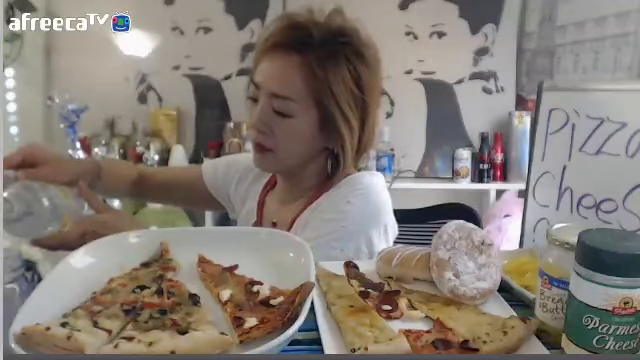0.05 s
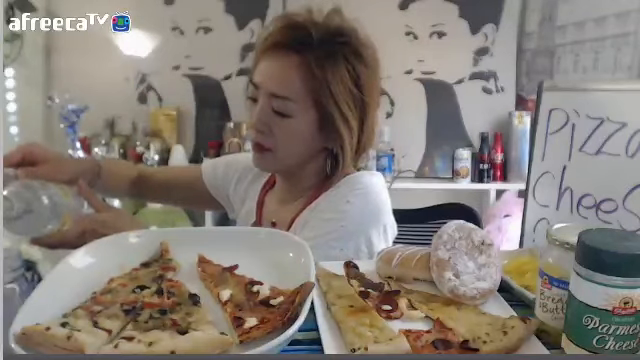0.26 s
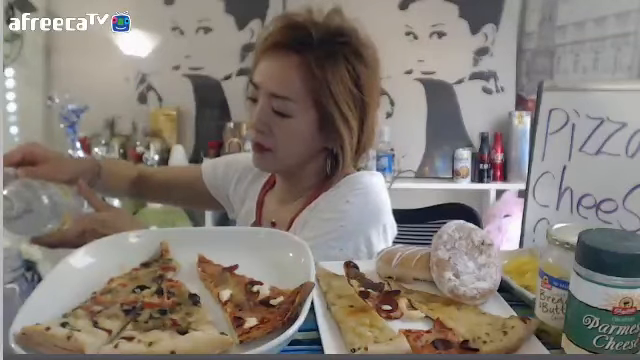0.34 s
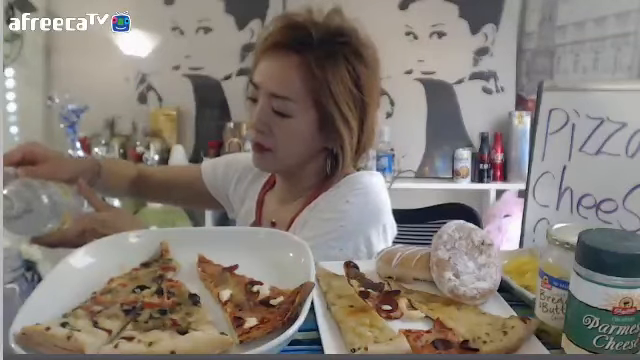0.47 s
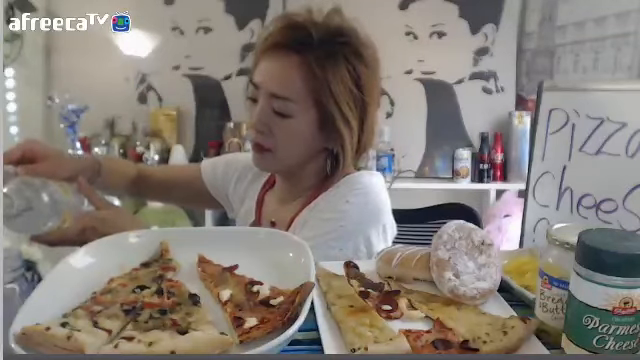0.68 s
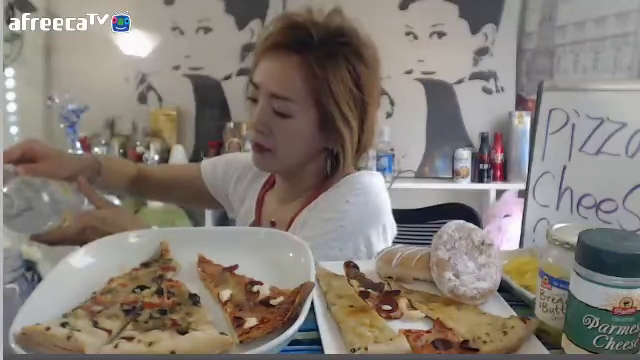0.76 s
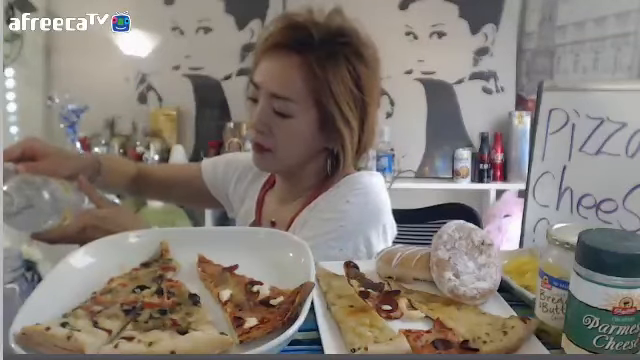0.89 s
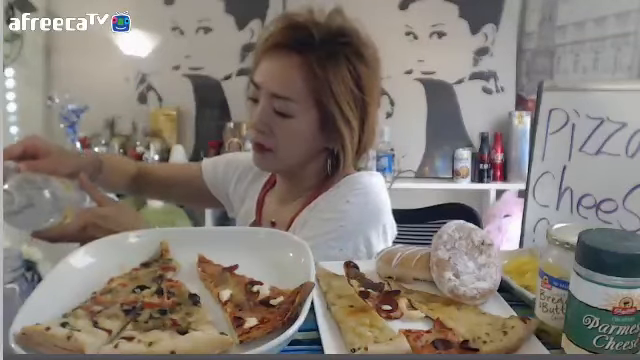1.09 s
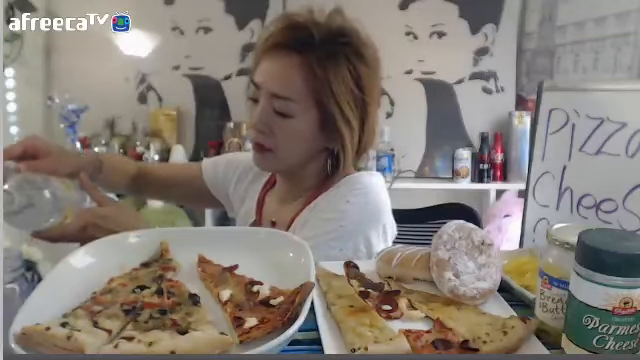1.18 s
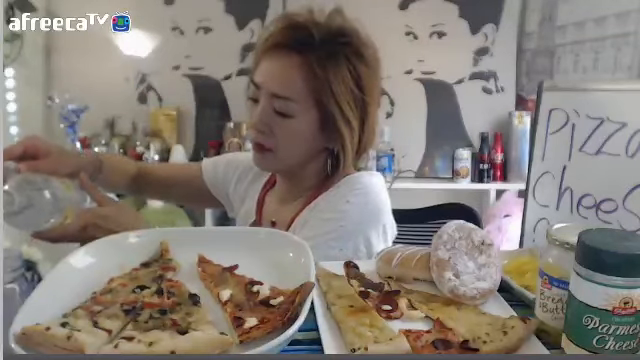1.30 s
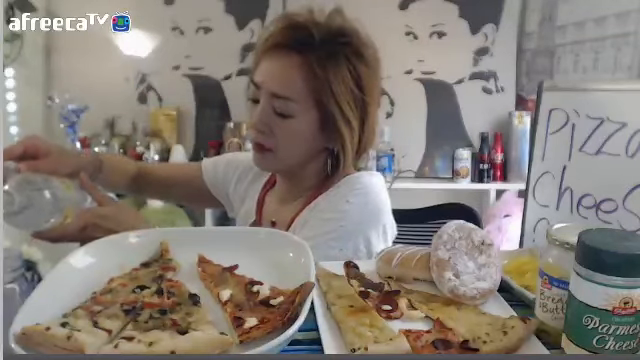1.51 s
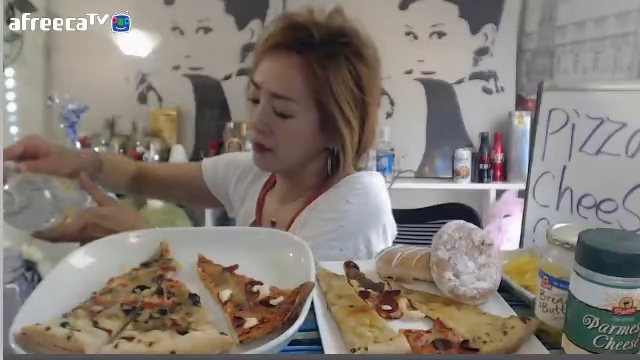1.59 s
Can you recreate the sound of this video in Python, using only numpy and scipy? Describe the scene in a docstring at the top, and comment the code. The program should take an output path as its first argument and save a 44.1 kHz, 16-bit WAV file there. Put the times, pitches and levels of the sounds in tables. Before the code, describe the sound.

A plastic bottle crackles loudly as a fizzy drink is poured into a glass.

```python
"""A fizzy drink poured from a thin plastic bottle into a glass, close to a nearly mono microphone, small room.
A few bubbles pop first. From 0.24 s the bottle wall buckles in a loud run of cracks as stream and foam swell.
From 0.7 s the drink glugs and splashes softly, bubbles burst and foam fizzes; ice taps the glass at 0.94 s.
A last soft crack and glug come near 1.55 s. A low machine throb and mains hum lie underneath throughout."""
import sys
import numpy as np
from scipy import signal
from scipy.io import wavfile
from scipy.ndimage import uniform_filter1d

SR = 44100
rng = np.random.default_rng(int(sys.argv[2]) if len(sys.argv) > 2 else 0)


def unload_audio(sound):
    """Save the sound as a 16-bit wav file, at the path given as the first command line argument."""
    columns = np.transpose(np.atleast_2d(sound))
    # keep every value between -1 and 1, then stretch to whole-number steps
    steps = np.round(np.clip(columns, -1, 1) * 32767)
    wavfile.write(sys.argv[1], SR, steps.astype(np.int16))


N = 72765
RISE_S = 0.00048  # attack of cracks, ticks and spits
LEFT_RIGHT = np.array([[1], [-1]])


def undb(db):
    """Decibels to gain."""
    return 10 ** (np.asarray(db) / 20)


def unit(x):
    """Scale to rms 1."""
    return x / np.sqrt(np.mean(x ** 2))


def band(x, lo_hz, hi_hz, order=2):
    """Band-pass filter."""
    return signal.sosfilt(signal.butter(order, [lo_hz, hi_hz], "band", fs=SR, output="sos"), x)


def colour(x, points):
    """Shape a sound by (f/Hz, level/dB) points; rms 1."""
    hz, db = np.array(points).T
    f = np.maximum(np.fft.rfftfreq(N, 1 / SR), 1)
    gain = undb(np.interp(np.log(f), np.log(hz), db))
    return unit(np.fft.irfft(np.fft.rfft(x) * gain, N))


def noise():
    """White noise."""
    return rng.standard_normal(N)


def grit(count):
    """Noise broken into half-millisecond grains of uneven size."""
    k = int(0.0005 * SR)
    grain_db = 5 * np.clip(rng.standard_normal(count // k + 1), -2, 2)
    return rng.standard_normal(count) * np.repeat(undb(grain_db), k)[:count]


def walk(rate_hz):
    """Smooth random drift; rms 1."""
    k = int(SR / rate_hz)
    steps = np.repeat(noise()[:N // k + 1], k)
    return unit(uniform_filter1d(uniform_filter1d(steps, k), k)[:N])


def since(start):
    """Seconds since a moment, zero before it."""
    return np.maximum(np.arange(N) / SR - start, 0)


def fade(t, rise_s, t60):
    """Quick rise and exponential decay."""
    return (1 - np.exp(-t / rise_s)) * np.exp(-np.log(1000) * t / t60)


def ring(t, hz, t60, rise_s=RISE_S, glide=0):
    """A fading sine whose pitch may rise as it fades."""
    return fade(t, rise_s, t60) * np.sin(2 * np.pi * hz * (t + glide * t * t / (2 * t60)))


def add(out, start, x):
    """Mix a sound in at a time."""
    i = int(start * SR)
    out[i:i + len(x)] += x[:max(N - i, 0)]


# bottle wall buckling at the microphone: t/s, bass/dB, body/dB, snap/dB, snap f/Hz, panel f/Hz, panel/dB
WALL_CRACKS = [(0.237, -22.5, -23.5, -23.5, 2770, 1176, -19), (0.2524, -24, -25, -27, 7000, 1210, -22),
               (0.2659, -12.5, -12.5, -5, 3400, 1223, -13), (.279, -9.5, -28, -36, 3020, 189, -10),
               (0.2924, -10.5, -4, -9, 3080, 1586, -7.5), (0.3047, -9.5, -3, -14, 5800, 1661, -1),
               (0.3104, -26, -18, -15, 3000, 1227, -2.5), (0.3184, -19, -14.5, -19.5, 7000, 1116, -2),
               (0.3406, -21.5, -16.5, -21.5, 4330, 239, -8.5), (.385, -15, -18.5, -17, 3800, 427, -9),
               (0.457, -36.5, -34.5, -26, 5800, 1940, -26.5), (.504, -13.5, -21, -15, 3500, 182, -23),
               (.527, -19.5, -31.5, -31, 5800, 580, -18), (.566, -20, -29, -25.5, 3980, 1740, -25.5),
               (1.544, -25, -39.5, -32.5, 4560, 207, -16)]
# ringing of the bottle: f/Hz, level/dB, t60/s
BOTTLE_MODES = [(195.3, 1.5, 0.1), (421.4, -2, 0.11), (628, -3.5, 0.078), (949, -1.5, 0.062),
                (1244, -3, 0.053), (2870, -11, 0.1), (3550, -7.5, 0.045), (3870, -12, 0.04),
                (4600, -6.5, 0.034), (5730, -6.5, 0.04)]
# bass, body and snap of a crack: low f/Hz, high f/Hz, crumple t60/s, crumple/dB, ring/dB
CRACK_REGISTERS = [(183, 814, 0.069, -3.5, -7), (747, 2180, 0.037, -1, -4), (2800, 8470, 0.022, -5.5, -8.5)]


def bottle_cracks():
    """Each buckle snaps one panel, crumples the wall around it and rings a new mix of bottle modes."""
    out, t = np.zeros(N), since(0)[:SR // 4]
    soften = signal.butter(1, 3570, fs=SR, output="sos")
    scatter_db, snap_spread = 2.5, 1.18
    for start, *levels, snap_hz, panel_hz, panel_db in WALL_CRACKS:
        for level_db, (lo, hi, t60, crumple_db, ring_db) in zip(levels, CRACK_REGISTERS):
            modes = sum(undb(db + scatter_db * rng.standard_normal()) * ring(t, hz, mode_t60)
                        for hz, db, mode_t60 in BOTTLE_MODES if lo <= hz < hi)
            grains = signal.sosfilt(soften, grit(len(t)))
            snap = undb(-0.5) * band(grains, snap_hz / snap_spread, snap_hz * snap_spread, order=1)
            crumple = unit(band(grains + snap, lo, hi)) * fade(t, RISE_S, t60)
            add(out, start, undb(level_db) * (undb(crumple_db) * crumple + undb(ring_db) * modes))
        add(out, start, undb(panel_db) * ring(t, panel_hz, t60=0.032))
    return out


# small creases in the wall, just as close: t/s, f/Hz, level/dB
CREASES = [(0.2125, 5000, -31), (.363, 5950, -27.5), (.411, 4300, -37), (.427, 5900, -36.5),
           (0.4959, 2170, -28), (0.543, 5660, -34)]


def crease_ticks():
    """Small creases give way one by one, each with its own pitch."""
    out, t = np.zeros(N), since(0)[:SR // 20]
    for start, hz, db in CREASES:
        grains = unit(band(grit(len(t)), hz / 1.25, hz * 1.25))
        add(out, start, undb(db) * grains * fade(t, RISE_S, t60=0.019))
    return out


# air entering the bottle and plops in the glass: t/s, f/Hz, level/dB, splash/dB
GLUGS = [(0.696, 400, -20, -30), (.762, 174, -23, -33.5), (0.827, 178, -23, -35), (0.861, 1000, -17, -31),
         (0.909, 179.5, -25.5, -32.5), (1.099, 175, -23, -30.5), (1.174, 433, -34, -30.5),
         (1.319, 370, -24, -33.5), (1.267, 189, -24, -30), (1.280, 950, -20.5, -29.5),
         (1.293, 455, -22.5, -32), (1.342, 179, -25.5, -29.5), (1.552, 260.6, -20.5, -61)]
# spectrum of a splash: f/Hz, level/dB
SPLASH_SPECTRUM = [(100, -30), (300, 4.5), (1100, -5.5), (1700, -12.5), (9000, -36)]


def glugs():
    """Large air pockets ring low for about 16 cycles, each with a small splash."""
    out, t = np.zeros(N), since(0)[:SR // 4]
    for start, hz, db, splash_db in GLUGS:
        splash = colour(noise(), SPLASH_SPECTRUM)[:len(t)] * fade(t, rise_s=0.0013, t60=0.063)
        pocket = ring(t, hz, t60=16.3 / hz, rise_s=0.0018, glide=0.043)
        add(out, start, undb(db) * pocket + undb(splash_db) * splash)
    return out


# single bubbles bursting near the microphone: t/s, f/Hz, level/dB
BUBBLES = [(0.0911, 2000, -20), (0.167, 2950, -31), (.185, 2600, -28.5), (0.2132, 2300, -22),
           (.676, 4430, -27.5), (0.756, 6230, -34.5), (1.0378, 4230, -34.5)]
# short spits of foam: t/s, level/dB
FOAM_SPITS = [(0.812, -37), (0.823, -34.5)]
# spectrum of spits, fizz and the ice's tick: f/Hz, level/dB
FIZZ_SPECTRUM = [(700, -1), (1500, 2.5), (5500, 0), (8000, -4), (10000, -14.5)]
BUBBLE_GLIDE = 0.11


def bubbles():
    """Each bubble bursts with a rough pop and a short rising ping; the foam spits twice."""
    out, t = np.zeros(N), since(0)[:SR // 10]
    for start, hz, db in BUBBLES:
        pop = unit(band(noise()[:len(t)], hz / 1.143, hz * 1.143)) * fade(t, rise_s=1 / hz, t60=0.029)
        ping = ring(t, hz, t60=22.4 / hz, rise_s=1 / hz, glide=BUBBLE_GLIDE)
        add(out, start, undb(db) * (ping + undb(-4) * pop))
    spits = sum(undb(db) * fade(since(start), RISE_S, t60=0.031) for start, db in FOAM_SPITS)
    return out + colour(noise(), FIZZ_SPECTRUM) * spits


def fizz(bursts_per_s=1000, width=0.1):
    """Tiny bubbles burst over the smooth hiss of the foam, slightly spread in stereo."""
    bursts, t = np.zeros(N), since(0)[:SR // 50]
    for when, pitch, size, length in rng.random((int(bursts_per_s * N / SR), 4)):
        hz = 1800 * 2 ** (2.3 * pitch)
        db = -np.log(0.013 + size)  # a few stand out
        ping = ring(t, hz, t60=(6 + 30 * length) / hz, rise_s=1 / hz, glide=BUBBLE_GLIDE)
        add(bursts, when * N / SR, undb(db) * ping)
    hiss = undb(-1.5) * colour(noise(), FIZZ_SPECTRUM)
    mid = unit(colour(bursts, FIZZ_SPECTRUM) + hiss)
    return mid + width * colour(noise(), FIZZ_SPECTRUM) * LEFT_RIGHT


# ringing after the tap of ice: f/Hz, level/dB, t60/s
ICE_MODES = [(1120, -2, 0.17), (1346, -4, 0.087), (2080, -8, 0.054)]


def ice_tap():
    """Ice taps the glass: a light tick and a short hollow ring."""
    t = since(0.94)
    tick = undb(-27) * colour(noise(), FIZZ_SPECTRUM) * fade(t, RISE_S, t60=0.023)
    return tick + undb(-30.5) * sum(undb(db) * ring(t, hz, t60) for hz, db, t60 in ICE_MODES)


# spectrum of the stream running into the glass: f/Hz, level/dB
STREAM_SPECTRUM = [(100, 1.5), (450, 3.5), (760, -9), (1550, -15.5), (3000, -61)]


def stream(flutter_db=0.5):
    """The stream churns unevenly."""
    return unit(colour(noise(), STREAM_SPECTRUM) * undb(flutter_db * walk(rate_hz=77)))


def glass_air(width_hz=54):
    """The stream keeps two narrow resonances of the air in the glass ringing."""
    return sum(undb(db) * unit(band(noise(), hz - width_hz / 2, hz + width_hz / 2, order=1))
               for hz, db in [(1125, -8), (1228, -10.5)])


# three low resonances of the surroundings, one of the air in the glass: f/Hz, t60/s, level/dB
HOLLOWS = [(190.5, 0.18, 0), (247.4, 0.32, 1), (420.3, 0.27, 0.5), (1141, 0.25, -5)]


def hollows(x):
    """Narrow resonances hum on briefly after each knock."""
    t = since(0)[:SR // 2]
    response = 0
    for hz, t60, db in HOLLOWS:
        shape = fade(t, 0.0071, t60)
        response += 2 * undb(db) * shape / np.sum(shape) * np.cos(2 * np.pi * hz * t)
    return signal.fftconvolve(x, response)[:N]


# the small room, heard from beside the glass: low f/Hz, high f/Hz, t60/s, level/dB
ROOM_BANDS = [(161, 920, 0.26, -10.5), (670, 4500, 0.2, -14.5), (2480, 8200, 0.15, -15.5)]


def room(x, delay_s=0.0038):
    """The room returns a short diffuse tail, longest in the bass."""
    t = since(delay_s)
    tail = 0
    for lo, hi, t60, db in ROOM_BANDS:
        shape = fade(t, 0.0013, t60)
        tail += undb(db) * band(noise(), lo, hi) * shape / np.sqrt(np.sum(shape ** 2))
    return signal.fftconvolve(x, tail)[:N]


# machine and mains hum in the room: f/Hz, level/dB
HUM_TONES = [(25, -34), (60, -39), (122, -51)]
# spectrum of the room's air: f/Hz, level/dB
AIR_SPECTRUM = [(20, -13.5), (110, 9), (900, -19.5), (3000, -27.5), (10000, -86)]


def room_tone(waver_db=0.8, throb_hz=33.1):
    """Wavering hum, an octave-wide machine throb and the air of the room."""
    t, hum = since(0), 0
    for hz, db in HUM_TONES:
        amplitude = np.sqrt(2) * undb(db - waver_db * walk(rate_hz=6.2))
        hum += amplitude * np.sin(2 * np.pi * (hz * t + rng.random()))
    throb = undb(-39) * unit(band(noise(), throb_hz / np.sqrt(2), throb_hz * np.sqrt(2)))
    return hum + throb + undb(-45) * colour(noise(), AIR_SPECTRUM)


# course of the pour at the microphone: t/s, fizz level/dB, stream level/dB
POUR_LEVELS = [(.19, -52, -44), (.3, -33.5, -25), (0.429, -52.5, -36), (0.621, -52, -43), (.9, -51.5, -42),
               (1.2, -49.5, -45.5), (1.5, -52.5, -49)]


def scene():
    """Bottle and glass close up, the room behind them, almost everything in the centre."""
    times, fizz_db, stream_db = np.array(POUR_LEVELS).T
    fizz_gain = undb(np.interp(since(0), times, fizz_db))
    stream_gain = undb(np.interp(since(0), times, stream_db))
    low_cut = signal.butter(3, 99, "high", fs=SR, output="sos")  # the close sounds carry little deep bass
    near = signal.sosfilt(low_cut, bottle_cracks() + crease_ticks() + ice_tap() + glugs() + bubbles())
    mid = near + hollows(near) + room(near) + stream_gain * (stream() + glass_air()) + room_tone()
    side = 0.068 * room(near) + undb(-24) * room_tone()
    return mid + side * LEFT_RIGHT + fizz_gain * fizz()


def record(dry, lead_s=9e-6, top_hz=9600, spike_top_hz=15400):
    """The left channel is a hair early; the loudest cracks clip into bright spikes above a narrow band."""
    skewed = dry + lead_s * SR / 2 * np.gradient(dry, axis=1) * LEFT_RIGHT
    narrow = signal.ellip(8, 0.2, 76, top_hz, fs=SR, output="sos")
    clipped = np.clip(signal.sosfilt(narrow, skewed), -0.95, 0.95)
    return signal.sosfilt(signal.ellip(8, 0.2, 76, spike_top_hz, fs=SR, output="sos"), clipped)


dry = scene()
out = record(dry)
unload_audio(out)
```